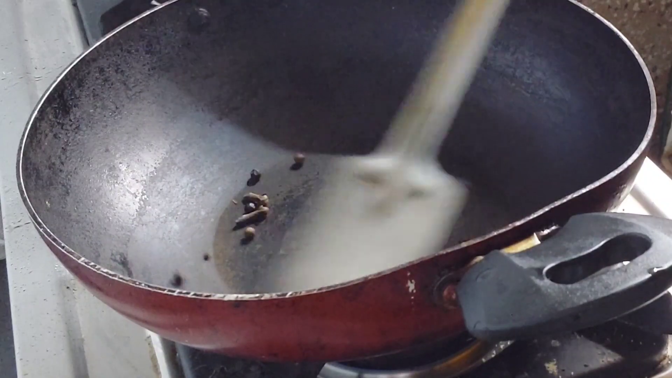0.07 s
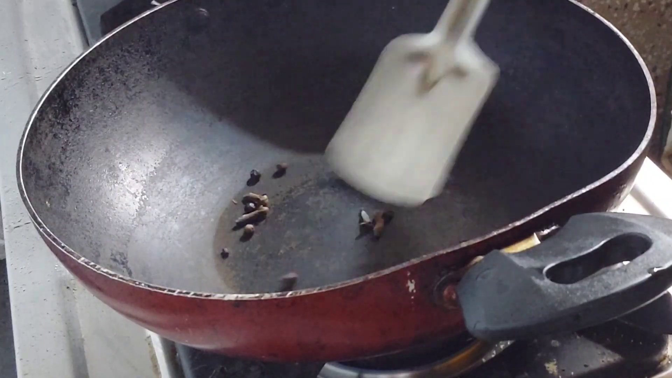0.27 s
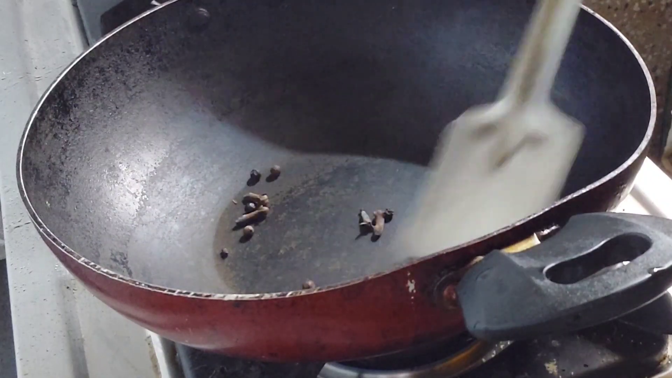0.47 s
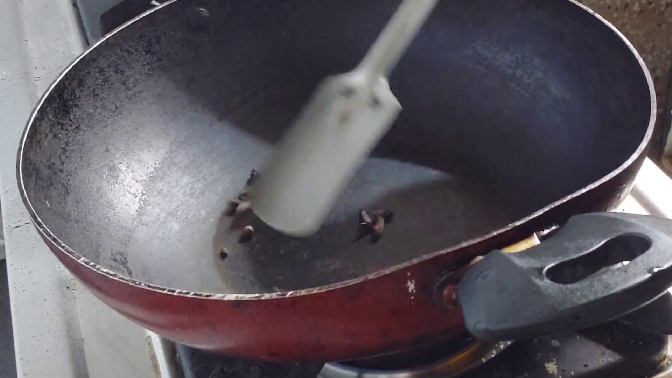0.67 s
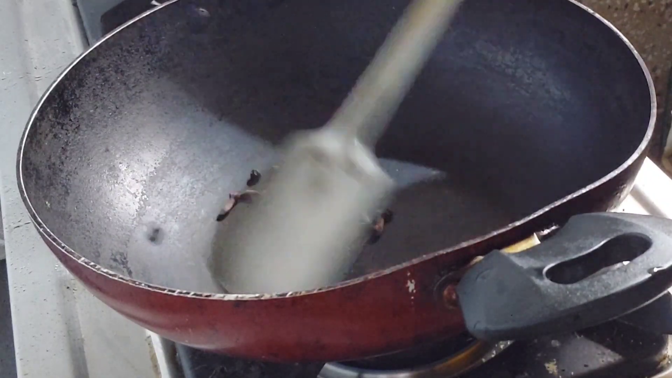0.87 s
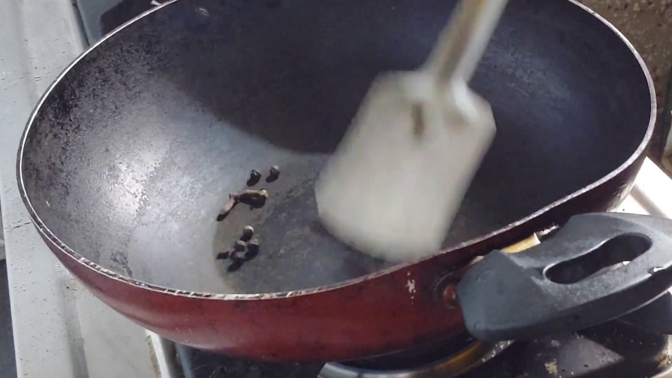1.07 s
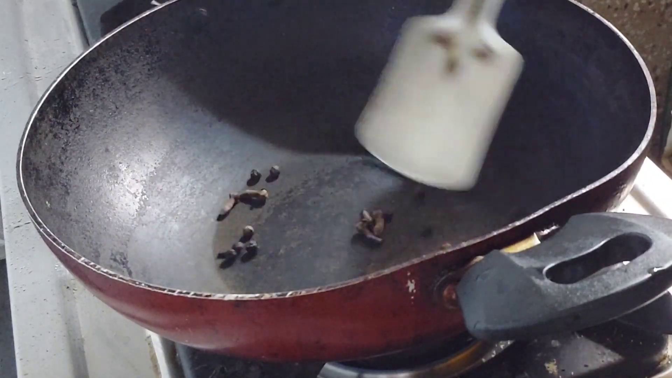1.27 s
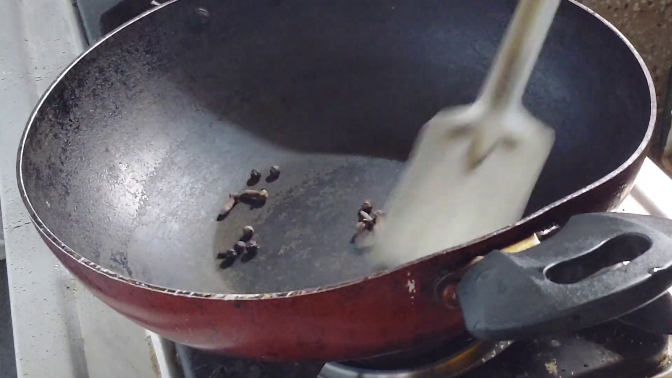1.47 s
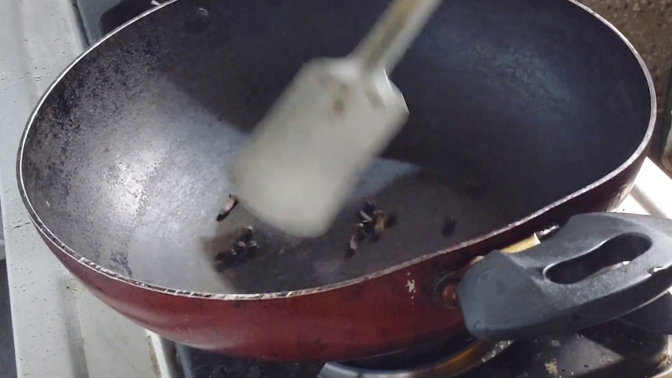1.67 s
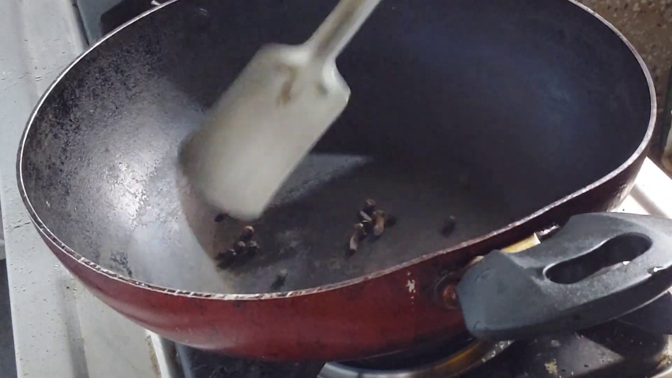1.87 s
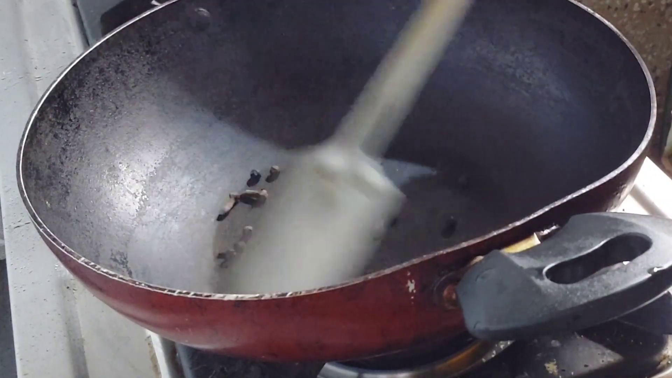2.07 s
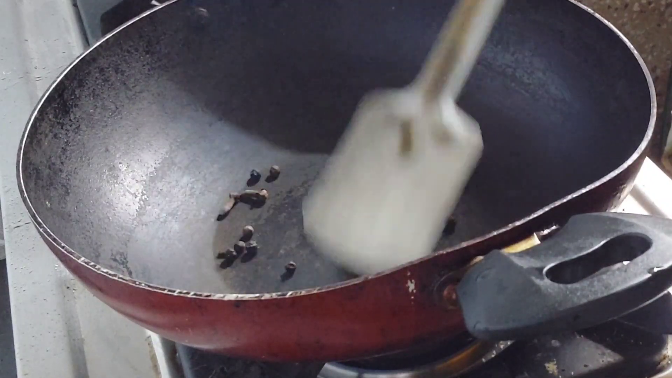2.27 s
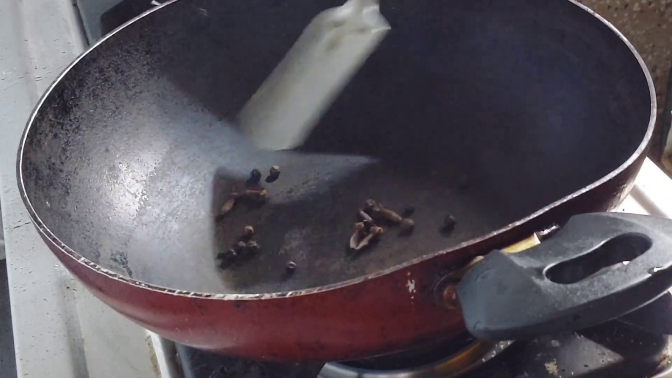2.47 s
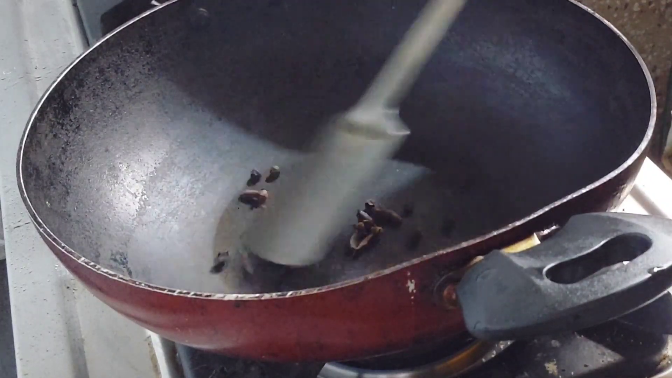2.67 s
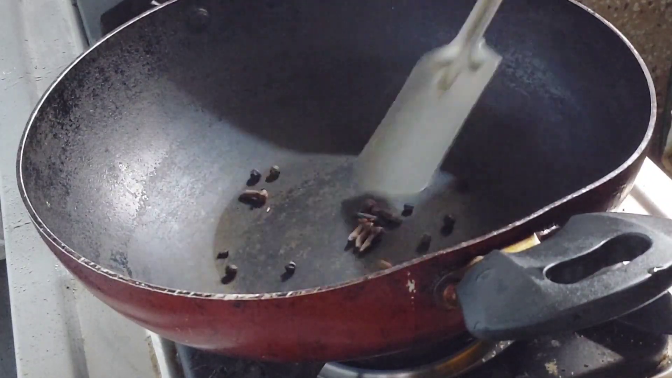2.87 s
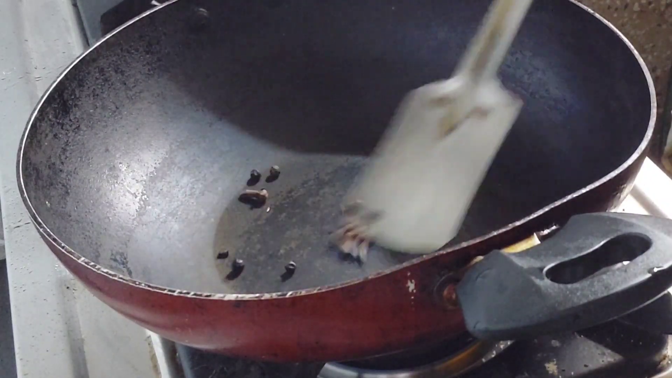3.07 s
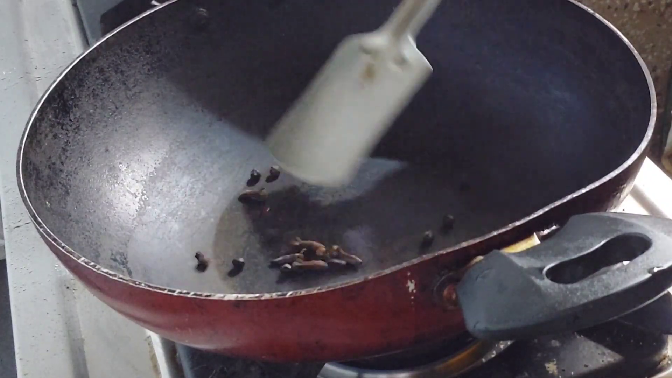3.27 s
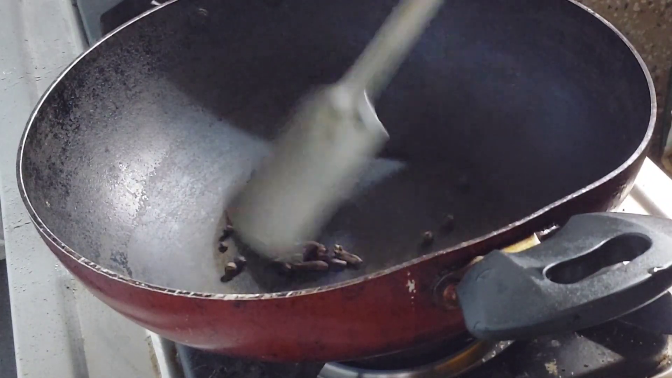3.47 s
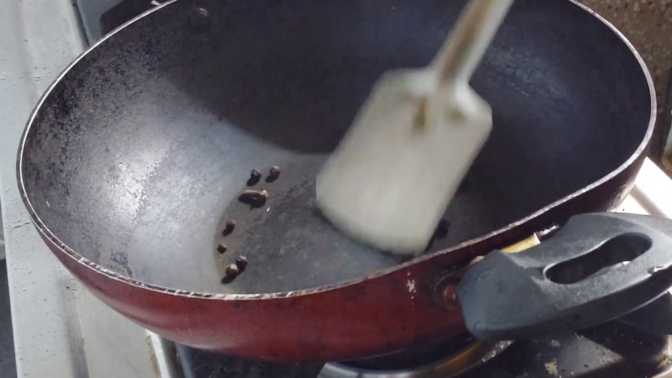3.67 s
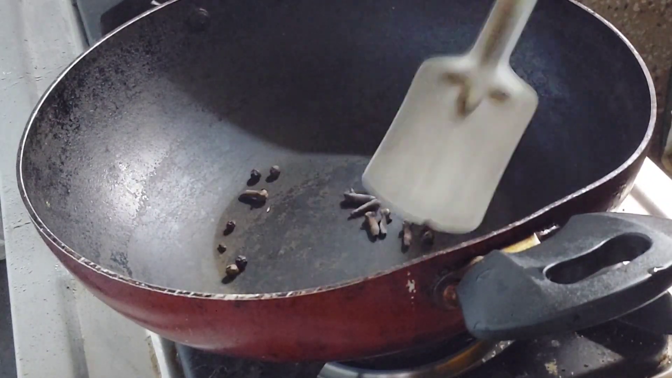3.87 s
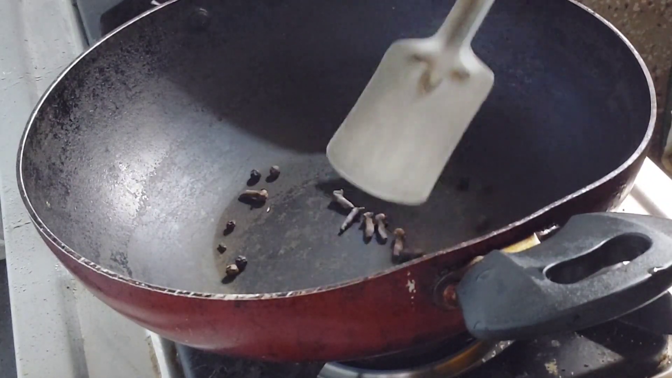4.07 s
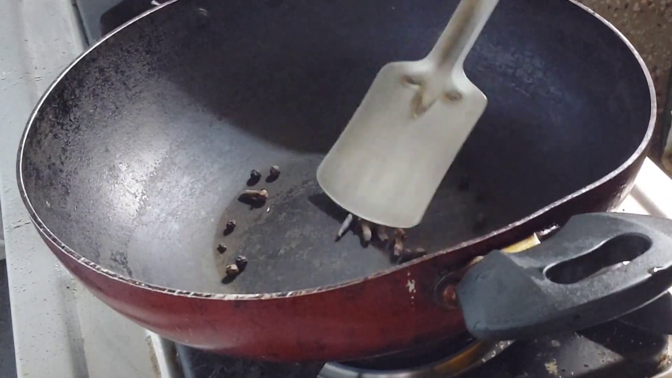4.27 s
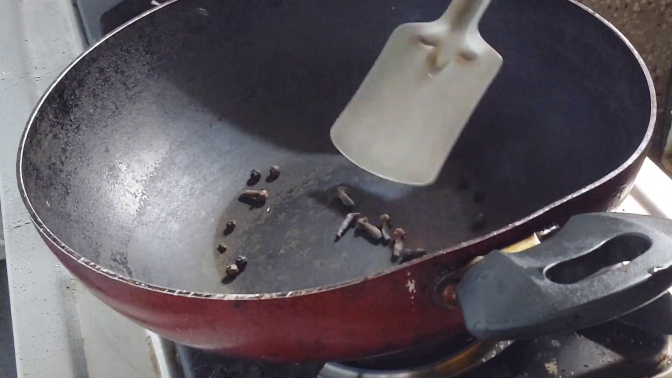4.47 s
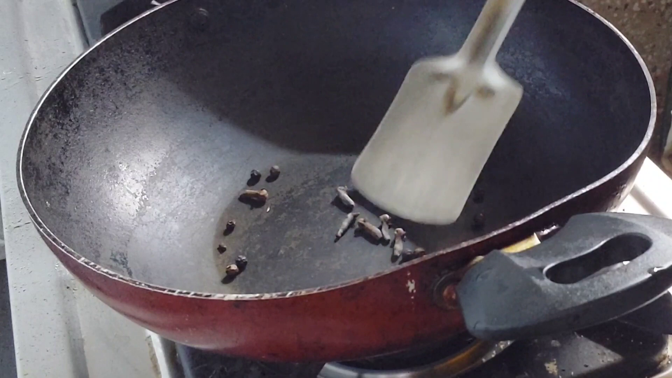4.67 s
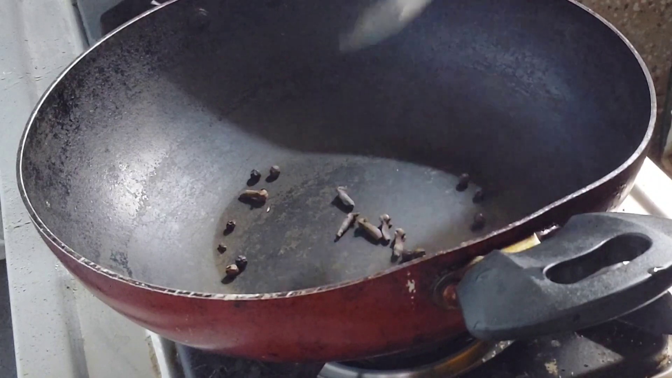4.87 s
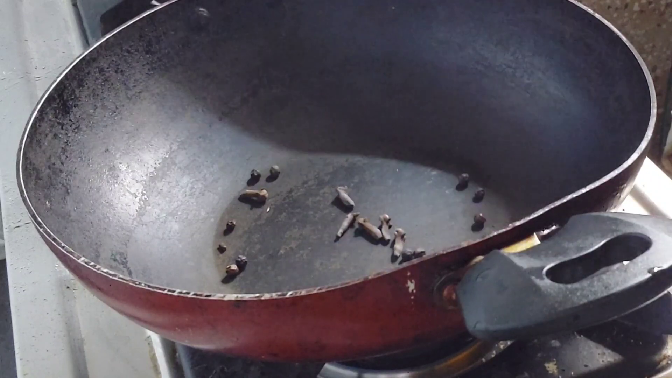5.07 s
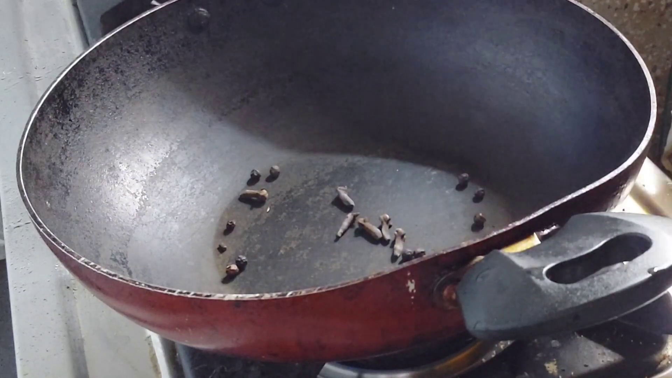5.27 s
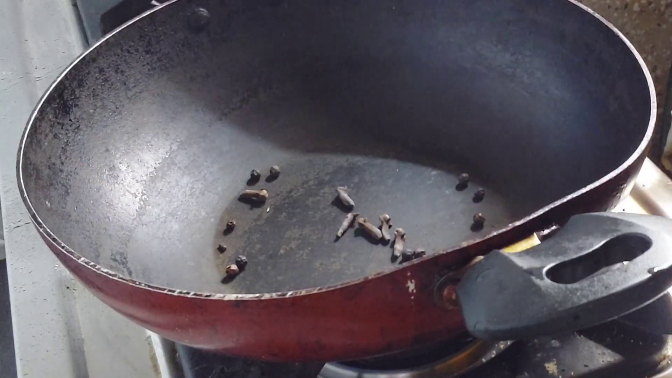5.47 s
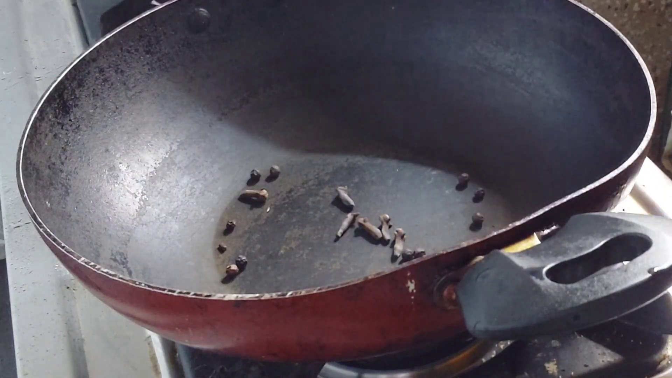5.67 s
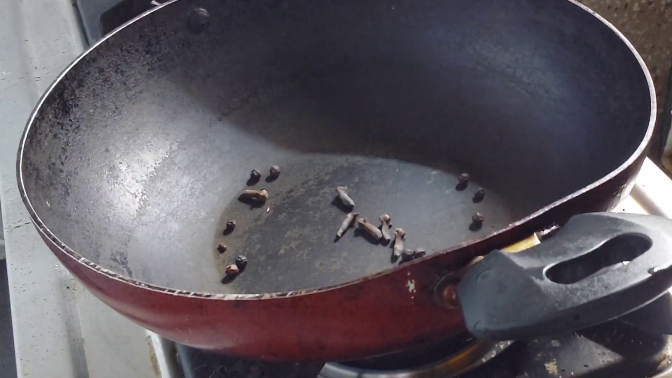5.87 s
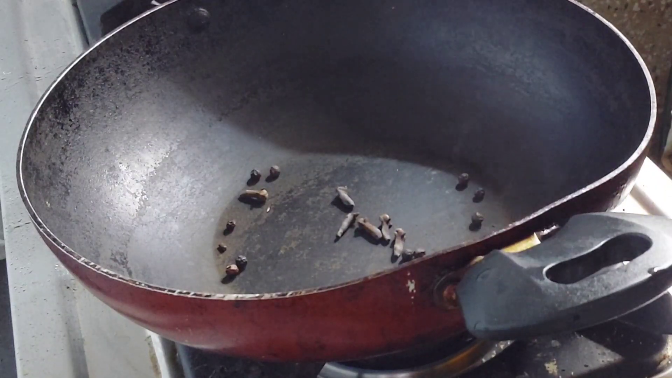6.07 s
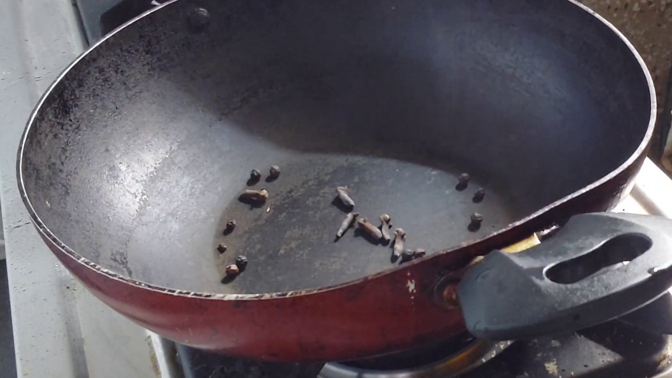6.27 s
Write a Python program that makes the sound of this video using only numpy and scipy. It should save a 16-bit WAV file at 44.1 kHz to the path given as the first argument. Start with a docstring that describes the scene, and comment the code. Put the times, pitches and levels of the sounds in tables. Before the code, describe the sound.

Repeated clanging knocks and short gritty scrapes of a blade in a dry pan, seeds skittering, ending in near silence with insect-like hiss.

```python
"""Stirring whole spices in a pan

A spatula stirs a few whole spices in a dry nonstick pan in a small hard-walled kitchen.
Strokes land with a knock (noise bursts through the pan's modes), then scrape (stick-slip clicks through them);
seeds tick and roll, the blade and rim ring as decaying sines, and the pan rocks on its stand at low pitch.
Behind are low room noise, a throbbing high hiss and faint quick ticks, like insects outside: shaped noise."""
import sys
import numpy as np
from scipy import signal
from scipy.fft import rfft, irfft, next_fast_len
from scipy.io import wavfile
from scipy.ndimage import uniform_filter1d

SR = 44100
rng = np.random.default_rng(int(sys.argv[2]) if len(sys.argv) > 2 else 0)


def output_pcm(signal):
    """Save a mono or channel-first signal as 16-bit PCM at the path in sys.argv[1].

    Samples are clipped to [-1, 1] before scaling.
    """
    pcm = np.clip(np.atleast_2d(signal).T, -1, 1) * 32767
    wavfile.write(sys.argv[1], SR, np.round(pcm).astype(np.int16))


N = 279064
TIME = np.arange(N) / SR

# blade lands on the pan or bumps its wall: start_s, thud_db, clang_db, edge_db, fizz_boost_or_cut_db (around 13 kHz),
# blade_ring_db, clang_and_ring_hz, edge_hz
KNOCKS = [(0.0131, -28, -32, -24, 4, -27, 803, 6300), (0.424, -37.5, -22.5, -23.5, 12, -24.5, 1015, 4850),
          (0.865, -28.5, -30, -25, 3.5, -25, 960, 6300), (1.019, -33, -35.5, -34, 7.5, -33, 615, 5600),
          (1.3806, -34.5, -22.5, -24, -4.5, -18.5, 979, 4550),
          (1.978, -30, -35.5, -35, -4, -28.5, 800, 5960), (2.244, -32, -44.5, -35.5, -12, -29, 795, 6200),
          (2.642, -27.5, -31, -34, -17.5, -20, 947, 6200), (3.059, -33.5, -18.5, -15.5, 7, -16, 995, 6280),
          (3.509, -33.5, -39, -37.5, -8.5, -30, 954, 6130), (3.94, -28, -16, -16.5, 4.5, -12, 864, 6740),
          (4.322, -50, -54.5, -53.5, -14, -35, 992, 3860), (4.665, -34.5, -23.5, -27, -2, -20.5, 960, 5050)]
# dense pan modes under the sliding blade: freq_hz, density_db_per_hz
SCRAPE_COLOUR = [(150, -2), (280, 0), (450, -7), (700, -12), (1000, -2.5), (1350, -2), (1700, -2),
                 (2600, -3), (3450, -4.5), (4300, -1.5), (6300, -4.5), (7200, -15), (9000, -28),
                 (10700, -15.5), (16000, -18.5)]
# low, middle and high register of the pan: low_hz, high_hz
REGISTER_HZ = [(130, 720), (720, 3500), (3500, 17000)]


def from_db(db):
    """Decibels to gain."""
    return 10 ** (np.asarray(db) / 20)


def rms_one(x):
    """Scale to rms 1."""
    return x / np.sqrt(np.mean(x ** 2) + 1e-20)


def energy_one(x):
    """Scale a response to unit mean energy per channel."""
    return rms_one(x) / np.sqrt(x.shape[-1])


def at_hz(points, hz):
    """Read a spectrum on a log-frequency axis."""
    points_hz, values = np.transpose(points)
    return np.interp(np.log(np.maximum(hz, 1)), np.log(points_hz), values)


def drift(knots_per_s):
    """Slow random wander of rms 1."""
    knots = rng.standard_normal(4000)
    return rms_one(np.interp(TIME * knots_per_s, np.arange(len(knots)), knots))


def swelling(rows):
    """Sum of Gaussian rises and falls in gain, from rows of middle_s, half_length_s, level_db."""
    return sum(from_db(db) * np.exp(-np.minimum(((TIME - s) / half_s) ** 2, 40)) for s, half_s, db in rows)


def band(x, low_hz, high_hz):
    """Band-pass."""
    return signal.sosfilt(signal.butter(4, [low_hz, high_hz], "band", fs=SR, output="sos"), x + 1e-18)


def through(x, response):
    """Convolve a signal with an impulse response."""
    return signal.oaconvolve(np.atleast_2d(x), np.atleast_2d(response), axes=-1)[:, :N]


def shaped(x, colour):
    """Filter a signal by a smooth gain curve."""
    size = next_fast_len(N, True)
    gain = from_db(at_hz(colour, np.fft.rfftfreq(size, 1 / SR)))
    return irfft(rfft(x, size) * gain, size)[..., :N]


def resonate(x, hz, width_hz, boost_db):
    """Boost or, if negative, cut one two-pole resonance in what passes."""
    r = np.exp(-np.pi * width_hz / SR)
    ring = signal.lfilter([1, 0, -1], [1, -2 * r * np.cos(2 * np.pi * hz / SR), r * r], x + 1e-18)
    return x + (from_db(boost_db) - 1) * (1 - r * r) / 2 * ring


def evened(x, width_hz):
    """Level the broad spectral humps of a short random response, keep its fine ripple; unit energy."""
    size = x.shape[-1]
    spectrum = rfft(x, 2 * size)
    bins = int(2 * width_hz * size / SR) | 1
    power = uniform_filter1d(uniform_filter1d(abs(spectrum) ** 2, bins), bins)
    return energy_one(irfft(spectrum / np.sqrt(np.abs(power) + 1e-12))[..., :size])


def two_ports(size, colour=None):
    """Diffuse noise at two close ports: alike in the bass, unrelated in the treble."""
    hz = np.fft.rfftfreq(size, 1 / SR)
    mid, side = rng.standard_normal((2, 2 * len(hz))).view(complex)
    alike = np.clip(0.78 * np.sinc(hz / 1500), -1, 1)
    mid = mid * np.sqrt(1 + alike)
    side = side * np.sqrt(1 - alike)
    gain = from_db(at_hz(colour, hz)) if colour else 1
    return irfft(np.array([mid + side, mid - side]) * gain, size)


def noise(colour):
    """Coloured diffuse noise of rms 1."""
    return rms_one(two_ports(next_fast_len(N, True), list(colour))[:, :N])


def pan_responses(colour, size=8192):
    """The pan's answer to a click per register: dense coloured modes, single resonances and two dips."""
    # pan resonances and two broad dips: freq_hz, width_hz, boost_or_cut_db (against the dense modes)
    pan_modes = [(308, 30, 8.5), (464.5, 4.8, 9.5), (554, 52, 7), (795.5, 5, 10.5), (839.5, 18, 6.5),
                 (966, 33, 11.5), (975, 170, 4.5), (1100, 26, 7), (1587.5, 33, 8), (1766, 130, 3),
                 (2013, 42, 5), (2383, 50, 5), (3484, 320, -9), (3800, 29, 7.5), (4130, 190, -8),
                 (4880, 88, 3.5), (5490, 45, 8), (5850, 22, 8.5), (6205, 36, 8), (6270, 160, 3.5),
                 (6580, 610, 5), (7574, 310, 11), (11360, 340, 6), (14100, 420, 6)]
    log_gain = np.log(from_db(at_hz(colour, abs(np.fft.fftfreq(size, 1 / SR)))))
    ring = np.fft.ifft(np.exp(np.conj(signal.hilbert(log_gain)))).real   # minimum phase: nothing sounds early
    for hz, width_hz, boost_or_cut_db in pan_modes:
        ring = resonate(ring, hz, width_hz, boost_or_cut_db)
    return [energy_one(band(ring, low_hz, high_hz)) for low_hz, high_hz in REGISTER_HZ]


def knocks(size=8192):
    """The blade strikes, then buzzes for milliseconds: noise bursts into three registers of pan modes."""
    # dense pan modes under a blow: freq_hz, density_db_per_hz
    knock_colour = [(150, -9), (300, -2.5), (520, -5.5), (680, -5), (1000, 0.5), (1400, -5), (2700, -2.5),
                    (3450, -10), (4100, -1.5), (6300, -7.5), (7200, -15), (9000, -25), (11000, -17.5),
                    (16000, -23.5)]
    strike_s, strike_db = 0.0016, -2.5   # first touch, against the buzz
    buzz_s = (0.022, 0.011, 0.0066)   # per register
    out, t = np.zeros(N + size), np.arange(size) / SR
    responses = pan_responses(knock_colour)
    for s, *levels_db, fizz_db, _, clang_hz, edge_hz in KNOCKS:
        at = max(round(s * SR), 0)
        for ring, level_db, fade_s in zip(responses, levels_db, buzz_s):
            contact = from_db(strike_db) * np.exp(-t / strike_s) + np.exp(-t / fade_s)
            force = evened(rng.standard_normal(size) * contact, width_hz=110)
            hit = signal.fftconvolve(force, ring)[:size]
            hit = resonate(hit, clang_hz, width_hz=130, boost_db=1.5)
            hit = resonate(hit, edge_hz, width_hz=150, boost_db=8)
            hit = resonate(hit, 13000, width_hz=5000, boost_db=fizz_db)
            out[at:at + size] += from_db(level_db) * energy_one(hit) * np.sqrt(0.03 * SR)
    return out[:N]


def steadied(clicks):
    """The hand presses evenly: level the rms over 25 ms, keep the grain."""
    return clicks / np.sqrt(np.abs(uniform_filter1d(clicks ** 2, size=1100)) + 1e-6)


def slips(per_s, spread_db):
    """Stick and slip: random clicks of uneven size and either sign, steady in mean force."""
    sizes = from_db(spread_db * np.minimum(rng.exponential(1, N), 4)) * rng.choice([-1, 1], N)
    return steadied(sizes * (rng.random(N) < per_s / SR))


def scratches():
    """The edge catches a coarse crumb now and then: short decaying bursts of stronger grinding."""
    catches_per_s, burst_s, burst_db = 95, 0.0011, 7
    caught = (rng.random(N) < catches_per_s / SR) * rng.uniform(0.5, 2, N)
    bursts = signal.lfilter([1], [1, -np.exp(-1 / (burst_s * SR))], caught + 1e-18)
    return rms_one(1 + from_db(burst_db) * bursts)


def bearing(stroke, floor_db, wall_db, release_db_per_s):
    """Gain of one stroke: floor level, ramp to wall level on the climb, sag in the lean, release."""
    ease_in_s, lean_sag_db_per_s = 0.0086, 13.5
    start_s, slide_s, climb_s, lean_s = stroke[:4]
    t = TIME - start_s
    height = np.clip((t - slide_s) / climb_s, 0, 1)
    leaning_s = np.clip(t - slide_s - climb_s, 0, lean_s)
    lifted_s = np.clip(t - slide_s - climb_s - lean_s, 0, 1)
    db = floor_db + (wall_db - floor_db) * height
    db = db - lean_sag_db_per_s * leaning_s - release_db_per_s * lifted_s
    return from_db(db) * np.clip(t / ease_in_s, 0, 1)


def gliding(force, centre_hz, octaves):
    """Feed a bank of resonances, most those nearest to a moving pitch."""
    out, pitch = 0, np.log2(centre_hz)
    for hz in np.geomspace(290, 900, 6):
        nearness = np.exp(-((pitch - np.log2(hz)) / octaves) ** 2)
        out = out + signal.lfilter(*signal.iirpeak(hz, 4, fs=SR), force * nearness + 1e-18)
    return out


def wandering(x):
    """The point of contact travels and favours shifting groups of modes: drifting band gains."""
    splits_hz = (1300, 2100, 3400, 5200, 7500)   # band edges
    spread_db, changes_per_s = 2.2, 70
    out = x
    for low_hz, high_hz in zip(splits_hz, splits_hz[1:]):
        sos = signal.butter(1, [low_hz, high_hz], "band", fs=SR, output="sos")
        group = signal.sosfilt(sos, x + 1e-18)
        out = out + (rms_one(from_db(spread_db * drift(changes_per_s))) - 1) * group
    return out


def scraping():
    """The blade judders, rasps over the coating and grinds grit: stick-slip clicks into the pan's modes."""
    # blade slides over the floor, climbs the wall, leans and lifts: start_s, slide_s, climb_s, lean_s,
    # landing_judder_db, floor_drag_db, wall_judder_db, wall_rasp_db, wall_grit_db, fizz_over_grit_db
    strokes = [(0.026, 0.085, 0.08, 0.059, -39, -44, -43, -32.5, -36.5, 3.5),
               (0.441, 0.052, 0.078, 0.042, -43.5, -38.5, -39, -23.5, -30.5, 0.5),
               (0.884, 0.082, 0.11, 0.033, -42, -46.5, -42, -30.5, -40, 7.5),
               (1.399, 0.095, 0.10, 0.014, -43, -38, -40.5, -28, -39, 5.5),
               (1.998, 0.22, 0.024, 0.078, -38, -45, -39.5, -31, -35, 5),
               (2.665, 0.058, 0.054, 0.02, -36.5, -40.5, -44, -25.5, -26.5, 0),
               (3.076, 0.029, 0.02, 0.048, -47.5, -39, -42.5, -31.5, -38.5, 8.5),
               (3.529, 0.049, 0.099, 0.018, -45.5, -45.5, -46.5, -33.5, -39.5, 5.5)]
    # seed dragged under the edge, very high: middle_s, half_length_s, level_db
    crunches = [(0.13, 0.018, -31.5), (0.545, 0.03, -47), (2.182, 0.019, -42)]
    # loose seeds roll back down the wall: middle_s, half_length_s, level_db
    rolls = [(0.775, 0.033, -46), (1.32, 0.065, -53), (1.855, 0.014, -52)]
    grit_over_drag_db = -2   # crumbs on the floor
    grit_clump_db = 2.5   # crumbs come in clumps
    lift_db_per_s, grit_settle_db_per_s = 498, 267   # blade leaves quickly, crumbs roll on a little
    judder_fade_db_per_s, judder_settle_db_per_s = 43, 319.5   # while sliding, after lifting
    # pan softest on its flat floor, stiffer up the wall: judder pitch sinks, then climbs
    landing_hz, floor_hz, wall_hz, sink_s = 574, 332, 800, 0.055
    glide_db = 5
    fizz_low_hz, fizz_high_hz = 8500, 17000

    low, middle, high = pan_responses(SCRAPE_COLOUR)
    top = band(high, fizz_low_hz, fizz_high_hz)
    upper = band(high, REGISTER_HZ[1][0], fizz_low_hz)
    catching = from_db(0.52 * drift(120))   # the edge snags and frees itself
    judder, rasp, grit, fizz, path = 0, 0, 0, 0, []
    for stroke in strokes:
        start_s, slide_s, climb_s, _, landing_db, drag_db, judder_db, rasp_db, grit_db, fizz_db = stroke
        shudder_db = landing_db - judder_fade_db_per_s * np.maximum(TIME - start_s, 0)
        judder = judder + bearing(stroke, shudder_db, judder_db, judder_settle_db_per_s)
        rasp = rasp + bearing(stroke, drag_db, rasp_db, lift_db_per_s)
        grinding = bearing(stroke, drag_db + grit_over_drag_db, grit_db, grit_settle_db_per_s)
        grit = grit + grinding
        fizz = fizz + from_db(fizz_db) * grinding
        path.append((start_s, landing_hz))
        path.append((start_s + min(sink_s, slide_s), floor_hz))
        path.append((start_s + slide_s + climb_s, wall_hz))

    judder = judder * slips(600, spread_db=3.5)
    judder_hz = np.interp(TIME, *np.transpose(path))
    judder = judder + from_db(glide_db) * gliding(judder, judder_hz, octaves=0.37)

    pressure = np.sqrt(rasp / rasp.max())
    rasp = rasp * steadied(scratches() * slips(900, spread_db=3.0))
    growl = resonate(rasp, 1800, width_hz=300, boost_db=5.6)
    rasp = rasp + pressure * (growl - rasp)   # pressed harder, the blade growls

    crumbs = slips(700, spread_db=0.5) * from_db(grit_clump_db * drift(45))
    rolling_grit = crumbs * (grit * scratches() + swelling(rolls))
    drives = [(judder, low), (rasp, middle), (rolling_grit, upper),
              (crumbs * fizz, top), (crumbs * swelling(crunches), energy_one(top))]
    return wandering(sum(through(force * catching, ring)[0] for force, ring in drives))


def struck(rows, peak_s, size=4096):
    """Short sine rings that build up and die, from rows of start_s, level_db, pitch_hz."""
    out, t = np.zeros(N + size), np.arange(size) / SR
    envelope = t / peak_s * np.exp(1 - t / peak_s)
    for s, db, hz in rows:
        at = max(round(s * SR), 0)
        out[at:at + size] += from_db(db) * envelope * np.sin(2 * np.pi * hz * t)
    return out[:N]


def blade():
    """The blade's own voice: rings at landings, dull bumps on the floor, wavering stick-slip groans."""
    # pressed on the metal, sticks and slips at its own pitch or higher: middle_s, half_length_s, level_db, pitch_hz
    groan_rows = [(0.25, 0.02, -35, 985), (0.584, .026, -18, 1000), (0.651, .013, -17.5, 976),
                  (1.095, .014, -30.5, 1660), (1.13, 0.0077, -26, 974), (1.575, 0.031, -23.5, 990),
                  (1.617, .012, -18, 1029), (2.29, 0.058, -32, 975), (2.79, 0.015, -29.5, 1810),
                  (2.812, 0.013, -25, 1060), (3.155, 0.045, -26.5, 1030), (3.7, 0.026, -26.5, 992)]
    # hops over the floor after landing: start_s, level_db, pitch_hz
    hops = [(0.033, -24.5, 477), (0.08, -33, 296), (0.89, -26.5, 473), (2.012, -26, 439), (2.068, -40, 300),
            (2.141, -26.5, 484), (2.672, -24.5, 310), (3.524, -30, 473)]
    waver_hz, rough_db = 36, 3
    waver = waver_hz * np.cumsum(drift(200)) / SR   # cycles
    rough = np.sqrt(2) * from_db(rough_db * drift(260))
    groans = 0
    for s, half_s, db, hz in groan_rows:
        groans = groans + swelling([(s, half_s, db)]) * np.sin(2 * np.pi * (hz * TIME + waver))
    landings = [(s, ring_db, hz) for s, *_, ring_db, hz, _ in KNOCKS]
    return rough * groans + struck(landings, peak_s=0.011) + struck(hops, peak_s=0.005)


def seeds(size=2048):
    """Hard seeds hit the metal: a sharp noise tick, then a faint sparse skitter, into the pan's modes."""
    # seeds snap from under the blade and hit the wall: start_s, level_db
    seed_hits = [(0.252, -9), (0.3434, -16), (0.3873, -15), (0.7048, -8), (0.8418, -8), (0.978, -8.5),
                 (1.117, -1.5), (1.514, -13), (1.608, 0), (1.9022, -25.5), (1.9304, -25), (2.164, -15),
                 (2.7846, 6.5), (3.251, -16), (3.587, -8.5), (3.609, -5), (3.841, -19), (3.875, -22)]
    tick_s, skitter_s, skitter_db = 0.0022, 0.013, -19
    force, t = np.zeros(N + size), np.arange(size) / SR
    for s, level_db in seed_hits:
        at = round(s * SR)
        tick, skitter = rng.standard_normal((2, size))
        touch = tick * np.exp(-t / tick_s)
        touch = touch + from_db(skitter_db) * skitter ** 3 * np.exp(-t / skitter_s)
        force[at:at + size] += from_db(level_db) * evened(touch, width_hz=300)
    _, middle, high = pan_responses(SCRAPE_COLOUR)
    return through(force[:N], high + from_db(-11.5) * middle)[0]


def rim():
    """One rim mode takes up energy at each catch and decays: a sine with slight drift in level and phase."""
    # blade catches the rim, which sings briefly if still touched: start_s, level_db, t60_s
    rim_catches = [(0.028, -53.5, 1.9), (0.6, -42, 0.54), (1.12, -48, 0.67), (1.78, -61.5, 4),
                   (2.3, -51.5, 0.62), (2.815, -38, 1.8), (3.077, -25.5, 0.25), (4.682, -47, 0.61)]
    rim_hz = 3787
    energy = 0
    for s, db, t60_s in rim_catches:
        decay_db = 60 * np.clip((TIME - s) / t60_s, 0, 2)
        energy = energy + (TIME > s) * from_db(db - decay_db) ** 2
    energy = uniform_filter1d(energy, size=1300)   # a catch lasts about 30 ms
    tone = np.sin(2 * np.pi * rim_hz * TIME + 0.25 * drift(8))
    return np.sqrt(2 * abs(energy)) * from_db(0.8 * drift(15)) * tone


def kitchen(x, wet_db, near_db, size=24576):
    """Direct sound, left port first, quick reflections from hob and wall, and a tail decaying by band."""
    # kitchen reverberation: freq_hz, t60_s
    kitchen_t60 = [(150, 0.62), (450, 0.52), (1000, 0.35), (3000, 0.41), (7000, 0.35), (15000, 0.29)]
    # direct sound earlier at the left port: freq_hz, lead_s
    left_lead = [(340, .00001), (1000, 0.000029), (2700, 0.00022), (6200, 0.000334), (16000, 0.00033)]
    t, white, tail = np.arange(size) / SR, two_ports(size), 0
    onset = np.clip(t / 0.002, 0, 1)
    edges_hz = np.geomspace(70, 18000, 9)
    for low_hz, high_hz in zip(edges_hz, edges_hz[1:]):
        t60_s = at_hz(kitchen_t60, np.sqrt(low_hz * high_hz))
        tail = tail + band(white, low_hz, high_hz) * from_db(-60 * t / t60_s)
    tail = energy_one(tail * onset)
    near = energy_one(two_ports(size) * np.exp(-t / 0.0056) * onset)
    hz = np.fft.rfftfreq(size, 1 / SR)
    delay_s = np.outer([0, 1], at_hz(left_lead, hz)) + 0.0005
    direct = irfft(np.exp(-2j * np.pi * hz * delay_s)) * (t < 0.1)
    response = evened(direct + from_db(wet_db) * tail + from_db(near_db) * near, width_hz=92)
    return from_db(1.0) * through(x, response)


def rocking():
    """Shoved, the pan rocks on its stand: decaying low sines over a softer rattle of low noise."""
    # shoves: start_s, level_db, pitch_hz
    shoves = [(.48, -43, 80), (0.821, -48, 103.2), (1.058, -40, 100.9), (1.431, -39, 78.6),
              (2.099, -46, 78), (2.7, -46.5, 75.6), (3.091, -44.5, 78.9), (4.003, -33, 77.4),
              (4.369, -40.5, 77.6), (4.719, -39, 76.8)]
    # rattle: freq_hz, density_db_per_hz
    rattle_colour = [(30, -27), (58, -15.5), (78, 1.5), (92, -10.5), (110, 0), (140, -11.5), (220, -51)]
    rise_s, fade_db_per_s, rest_db, rattle_db = 0.01, 90, -58, -9   # rattle_db against the swing
    swings, rattle, wobble = 0, from_db(rest_db), 0.5 * drift(25)
    for s, db, hz in shoves:
        fading_s = np.maximum(TIME - s - rise_s, 0)
        swing = from_db(db - fade_db_per_s * fading_s) * np.clip((TIME - s) / rise_s, 0, 1)
        swings = swings + np.sqrt(2) * swing * np.sin(2 * np.pi * hz * (TIME - s) + wobble)
        rattle = rattle + from_db(rattle_db) * swing
    return swings + rattle * noise(rattle_colour)


def rumble():
    """A dull noise swells and sinks in the room, louder at the right; its floor drops at the last knock."""
    # swells: middle_s, half_length_s, level_db
    swells = [(3.86, .06, -46), (4.05, .09, -43), (4.4, 0.11, -39.5), (4.731, 0.079, -46),
              (5.313, 0.18, -50), (5.88, 0.26, -56)]
    # rumble: freq_hz, density_db_per_hz
    rumble_colour = [(100, -31), (160, -8.5), (215, 6), (275, 1.5), (370, -11.5), (600, -23.5), (900, -33),
                     (2000, -52)]
    stirring_db, rest_db = -54.5, -75   # while the spatula works, and after
    stirring = TIME < KNOCKS[-1][0]
    gain = np.where(stirring, from_db(stirring_db), from_db(rest_db)) + swelling(swells)
    return gain * from_db(2 * drift(15)) * noise(rumble_colour) * from_db([[-2.5], [2.2]])


def insects():
    """A narrow hiss throbs about seven times a second, beside a quicker train of thin noise ticks."""
    # narrow hiss: freq_hz, density_db_per_hz
    hiss_colour = [(4500, -37.5), (5400, -23.5), (6000, -9.5), (6400, 0.5), (6750, -7), (7200, -32.5),
                   (8000, -44)]
    # ticks: freq_hz, density_db_per_hz
    tick_colour = [(6000, -33.5), (9000, -30.5), (12500, -10), (15500, -0.5), (17000, -10)]
    throb_period_s, tick_period_s = 0.139, 0.0765
    throb = np.cos(2 * np.pi * (TIME - 5.63) / throb_period_s)
    hiss = from_db(-63.0 + 3.8 * throb + drift(62)) * noise(hiss_colour) * from_db([[-4.5], [3.5]])
    since_tick_s = (TIME - 5.453 + 0.002 * drift(3)) % tick_period_s
    ticking = np.exp(-since_tick_s / 0.0046) * from_db(2.5 * drift(15)) + 0.16
    ticks = from_db(-60.0) * ticking * noise(tick_colour) * from_db([[-4], [3]])
    return hiss + ticks


def air():
    """Steady background: diffuse noise, strongest in the bass."""
    # background: freq_hz, density_db_per_hz
    air_colour = [(18, -49), (30, -12.5), (81, -8.5), (215, -2.5), (426, -19), (1960, -28.5), (3400, -37.5),
                  (5170, -41.5), (6380, -18), (6900, -27), (7470, -42), (8740, -45), (14800, -29.5),
                  (16000, -35)]
    return from_db(-60.5) * noise(air_colour)


def scene():
    """The pan in its kitchen, tilted between the ports by frequency, over the background."""
    # level tilt between the ports, positive louder at the right: freq_hz, right_over_left_db
    port_tilt = [(100, -5.5), (300, 4), (1000, 1), (3000, -0.5), (4500, 4.5), (5400, 6), (6200, 13.5),
                 (7000, 4.5), (7700, -3.5), (9000, -6.5), (11500, 2.5), (13000, -1), (15000, 13)]
    blade_room_db, blade_lead_s = -14.5, 0.00029   # share in the room; lead at the left port
    voice = blade()
    contacts = knocks() + scraping() + seeds() + from_db(blade_room_db) * voice
    direct_voice = np.array([voice, np.interp(TIME - blade_lead_s, TIME, voice)])
    pan = kitchen(contacts, wet_db=-0.5, near_db=3.0) + rim() + direct_voice
    left = shaped(pan[0], [(hz, -db / 2) for hz, db in port_tilt])
    right = shaped(pan[1], [(hz, db / 2) for hz, db in port_tilt])
    return np.array([left, right]) + rocking() + rumble() + insects() + air()


def record(dry):
    """Clip peaks at 0.9 of full scale, then low-pass steeply at 16 kHz."""
    top_cut = signal.ellip(10, 0.1, 80, 16000, fs=SR, output="sos")
    return signal.sosfilt(top_cut, np.clip(dry, -0.9, 0.9))


dry = scene()
out = record(dry)
output_pcm(out)
```